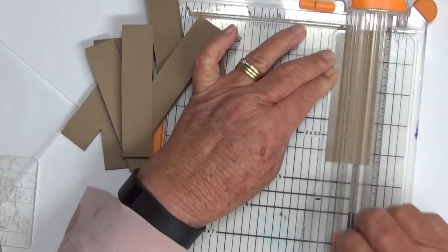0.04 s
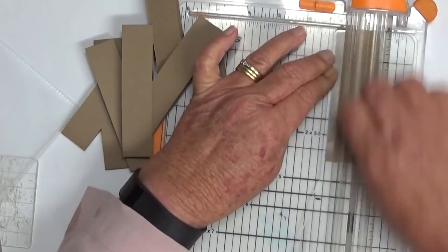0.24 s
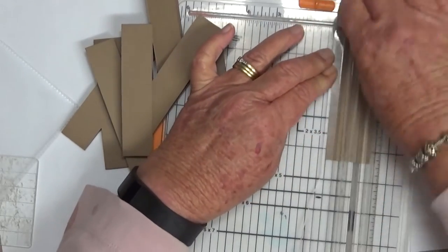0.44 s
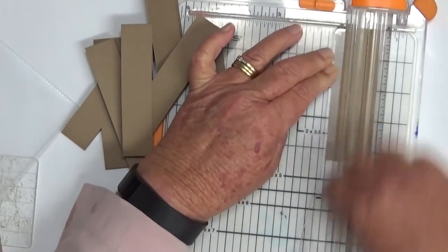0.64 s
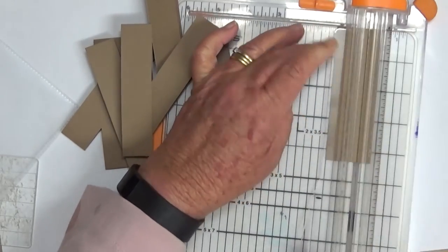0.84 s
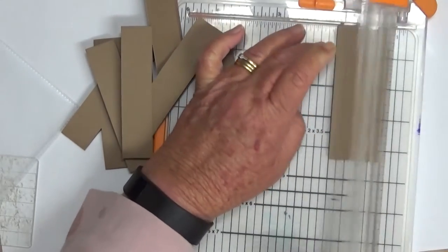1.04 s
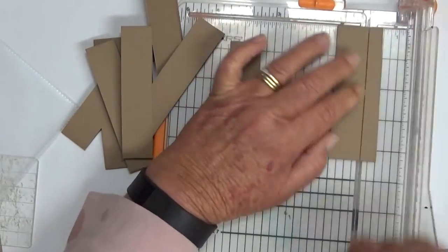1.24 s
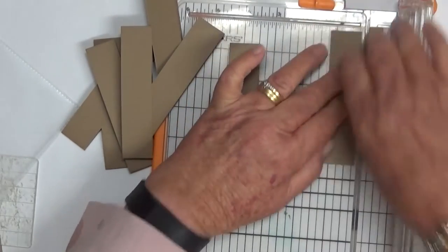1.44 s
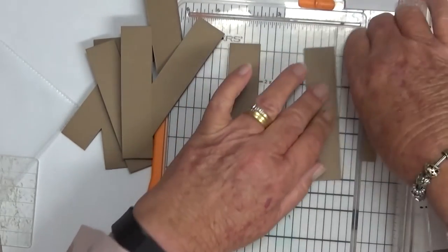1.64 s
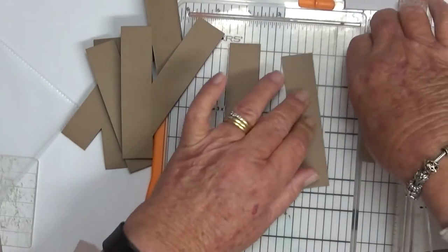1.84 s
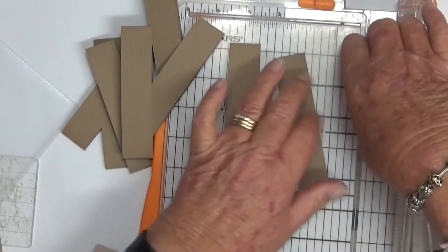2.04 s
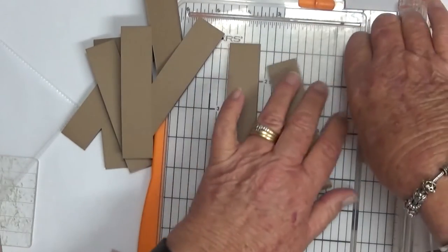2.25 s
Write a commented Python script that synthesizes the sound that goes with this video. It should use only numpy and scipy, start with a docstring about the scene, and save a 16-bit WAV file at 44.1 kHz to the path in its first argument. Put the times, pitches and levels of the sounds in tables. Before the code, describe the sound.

Close up, a paper trimmer cuts card with two quick, rumbling scrapes. A knock and sharp plastic clicks follow as the guard lifts, a bracelet tinkles faintly, and card strips hiss across the base in a quiet room.

```python
"""Paper trimmer on a craft table

Close by, the blade carriage of a plastic trimmer scrapes through card, up and back, and friction makes
the deck rumble. Impacts excite the modes of the clear guard rail and the deck as the rail clicks, knocks
and is swung open. Fingers slide the cut strips, hands bump the table and a bracelet charm tinkles.
A small, quiet room answers with a short reverberation."""
import sys
import numpy as np
from scipy import signal
from scipy.fft import rfft, irfft, next_fast_len
from scipy.io import wavfile
from scipy.ndimage import uniform_filter1d, map_coordinates

SR = 44100
rng = np.random.default_rng(int(sys.argv[2]) if len(sys.argv) > 2 else 0)


def pcm_store(signal):
    """Save signal as 16-bit PCM."""
    levels = np.round(np.clip(np.atleast_2d(signal), -1, 1) * 32767)
    wavfile.write(sys.argv[1], SR, levels.astype(np.int16).T)


N = 101429

# normal modes of the guard rail and of the deck (frequency [Hz], level [dB], t60 [s])
RAIL_MODES = [(2080, 3, 0.057), (2850, 3.5, 0.065), (3570, 3, 0.1), (4030, 2.5, 0.085), (4536, 1.5, .045),
              (5660, 4, 0.038), (6400, 1.5, 0.023), (7035, 0.5, 0.041), (7420, 2, 0.021), (7720, -9, 0.017),
              (9160, 4, .035), (9930, -1, 0.032)]
DECK_MODES = [(74.2, -23.5, 0.62), (147, -22, 0.11), (227, -2.5, 0.083), (294, -4.5, 0.079),
              (350.5, -5, 0.068), (441, -2.5, 0.043), (536, -4.5, 0.065), (614, 1, 0.051),
              (853, -0.5, 0.06), (1166, 2.5, 0.044), (1488, -7, 0.11)]
# spectrum of the reflections that give width (frequency [Hz], gain [dB])
REFLECTION_SPECTRUM = [(100, -27), (400, 1), (1300, 4.5), (4000, 0), (9000, -0.5), (15000, -17.5)]


def carriage():
    """Forced vibration: each stroke scrapes the card and drives the deck's resonances."""
    # envelopes of the two strokes (time [s], scrape level [dB], rumble level [dB])
    push = [(.04, -55, -51.5), (.07, -48.5, -51), (.125, -46, -54.5), (.174, -40.5, -54.5),
            (.24, -37.5, -43.5), (.256, -31, -34.5), (.32, -32, -43), (.36, -27, -37.5), (.385, -32.5, -44),
            (.415, -33.5, -40), (.455, -38, -36), (.48, -50, -47), (.53, -62, -61)]
    pull = [(.53, -56.5, -76), (.578, -39, -48.5), (.62, -36, -36.5), (.66, -31.5, -34), (.683, -24, -37),
            (.70, -32, -40), (.74, -35.5, -72), (.775, -53.5, -42.5)]
    # spectra of the two scrapes and of the deck's rumble (frequency [Hz], level [dB])
    push_spectrum = [(300, -40), (1000, 0), (2500, 2.5), (4000, 7), (5300, -0.5), (7000, 4.5), (9800, 6.5),
                     (12000, -6), (15500, -17)]
    pull_spectrum = [(300, -3.5), (1000, 4), (2500, 3.5), (3700, 5.5), (5300, 1), (8000, 3), (10000, -0.5),
                     (12000, -8.5), (15500, -17)]
    rumble_spectrum = [(25, -27), (70, -6), (125, -5.5), (220, 6), (320, 0), (550, -2.5), (900, -0.5),
                       (1600, -9), (4000, -31)]

    def deck_db(f):
        peaks = sum(1.3 / (1 + ((f - hz) / 14) ** 2) for hz, _, _ in DECK_MODES)
        return along(rumble_spectrum, f) + 20 * np.log10(1 + peaks)

    out = np.zeros(N)
    for stroke, spectrum in (push, push_spectrum), (pull, pull_spectrum):
        scrape, rumble = envelopes(stroke)
        out += scrape * friction(spectrum, ring_db=-19) + rumble * noise(deck_db, N)
    return out


def friction(spectrum, ring_db):
    """Roughness noise: card fibres rub and excite the rail; the colour shifts as the contact moves."""
    def rail_db(f):
        peaks = sum(amp(ring_db + db) / (1 + ((f - hz) * t60 / 4) ** 2) for hz, db, t60 in RAIL_MODES)
        return 20 * np.log10(1 + peaks)

    spectrogram = signal.stft(grains(N, depth_db=2, per_s=1500), nperseg=512)[2]
    patches = uniform_filter1d(rng.standard_normal(spectrogram.shape), size=4, axis=0)
    patches_db = 3 * unit(uniform_filter1d(patches, size=9, axis=1))
    rub = signal.istft(spectrogram * amp(patches_db), nperseg=512)[1][:N]
    return unit(coloured(rub, lambda f: along(spectrum, f) + rail_db(f)))


def rail_clicks():
    """Impact excitation: hard plastic chatters for milliseconds, then the rail's modes ring freely."""
    # clicks (time [s], level [dB], chatter [s], centre [Hz], width [octaves], favoured frequency [Hz])
    clicks = [(0.4278, -14.5, 0.0011, 6200, 0.41, 6600), (.6715, -23.5, .0005, 4850, 0.28, 3570),
              (0.8556, -32, 0.0019, 1700, 1.6, 2850), (.8665, -29, .002, 1000, 0.48, 2850),
              (0.9326, -20.5, .0015, 9900, 0.59, 9300), (.944, -34.5, 0.0023, 10000, 1.5, 9160),
              (.974, -20, 0.00084, 8950, 0.82, 7420), (.988, -32, 0.0018, 8340, .54, 9160),
              (1.096, -34.5, 0.0032, 10000, 0.15, 9930), (1.112, -39, 0.00077, 2600, 0.54, 2850),
              (1.1425, -31, .0007, 2480, 0.87, 2850), (1.2117, -16.5, 0.0017, 8200, 0.78, 7420),
              (1.2182, -19, 0.0022, 8100, 0.82, 7420), (1.224, -26, 0.0041, 4500, 1.1, 5050),
              (1.2332, -26.5, 0.0035, 8000, 3.1, 9930), (1.2525, -29, 0.0019, 2180, 1.3, 2850),
              (1.2678, -30, 0.0029, 1980, 0.45, 2850), (1.2878, -30.5, 0.0011, 1900, 1, 2080),
              (1.3016, -43, .0005, 5000, 0.66, 6400), (1.512, -21, .0019, 7500, 1.05, 4400),
              (1.6708, -22.5, 0.0019, 6700, 0.85, 7300), (1.781, -18.5, 0.0034, 9100, 0.91, 5660),
              (2.0126, -25.5, .003, 6400, 0.8, 7500), (2.258, -42, 0.0029, 9000, .96, 7420)]
    # spectrum of the contact noise (frequency [Hz], level [dB])
    crack_spectrum = [(200, -18), (700, 0.5), (1400, 2), (2400, 1), (3700, 5.5), (5000, 4), (7000, 3),
                      (10000, 5.5), (12500, -2), (15500, -11)]
    rail_db = lambda f: 3.5 * sum(np.exp(-((f - hz) / 52) ** 2) for hz, _, _ in RAIL_MODES)
    out, t = np.zeros(N), event_time()
    for start, db, chatter, centre_hz, octaves, favoured_hz in clicks:
        crack_db = lambda f: along(crack_spectrum, f) + bell(f, centre_hz, octaves) + rail_db(f)
        crack = noise(crack_db, len(t)) * decay(t - chatter, t60=0.02)
        ring = np.zeros(len(t))
        for hz, mode_db, t60 in RAIL_MODES:
            lift_db = 10.5 * np.exp(-((hz - favoured_hz) / 490) ** 2)
            gain = amp(mode_db + bell(hz, centre_hz, octaves) + lift_db + rng.normal(0, 0.5))
            cycles = hz * t + rng.random() + 0.0085 * random_walk(len(t))
            ring += gain * decay(t, t60) * np.sin(2 * np.pi * cycles)
        add(out, start, amp(db) * (crack + amp(-16.5) * ring))
    return out


def deck_knocks():
    """Modal response: a knock gives a dead slap and rings the deck; longer contact is duller."""
    # knocks of the rail and hands (time [s], level [dB], contact time [s])
    knocks = [(.856, -18, 0.0011), (.8675, -19, 0.0012), (1.2525, -40.5, .0005), (2.028, -45, 0.00079),
              (2.279, -44, 0.00053)]
    out, t = np.zeros(N), event_time()
    slap = amp(7.5) * np.sin(2 * np.pi * 500 * t) * decay(t, t60=0.014)
    for start, db, contact in knocks:
        ring = np.zeros(len(t))
        for hz, mode_db, t60 in DECK_MODES:
            gain = amp(mode_db + rng.normal(0, 1)) / (1 + (hz * contact) ** 2)
            ring += gain * decay(t, t60) * np.sin(2 * np.pi * hz * t)
        add(out, start, amp(db) * (0.64 * ring + 1.6 * slap) * attack(t, contact))
    return out


def card_strips():
    """Sliding friction: cut strips hiss over the deck and catch in short stick-slip scuffs."""
    # envelope of the sliding (time [s], level [dB])
    slide = [(.92, -52.5), (.99, -52), (1.03, -44), (1.07, -50), (1.19, -50.5), (1.33, -46.5), (1.45, -49),
             (1.6, -44.5), (1.66, -49.5), (1.76, -50.5), (1.85, -57), (1.92, -55), (2.05, -54), (2.11, -52),
             (2.14, -91), (2.175, -50), (2.22, -92), (2.3, -76)]
    # spectrum of the sliding (frequency [Hz], level [dB])
    slide_spectrum = [(150, 5.5), (600, -3), (1200, -2.5), (1900, 1), (2600, -4), (4000, -1), (6000, -5),
                      (9000, -2.5), (12000, -14), (15500, -48)]
    # scuffs (peak time [s], level [dB], half rise time [s], t60 [s], centre [Hz], width [octaves])
    scuffs = [(0.247, -25.5, 0.0031, 0.024, 6000, 9.3), (.364, -20, 0.0049, 0.036, 6360, 0.34),
              (0.421, -24, 0.0016, 0.15, 2900, 0.68), (.789, -37.5, 0.004, 0.074, 4050, 0.37),
              (.843, -38, 0.0081, 0.052, 3570, 0.78), (0.875, -26, 0.0052, 0.046, 4030, 0.38),
              (1.102, -30, 0.0072, 0.099, 2520, 0.47), (1.146, -45.5, 0.0037, 0.42, 2320, 0.64),
              (1.245, -27.5, 0.0084, 0.11, 2230, 1.6), (1.273, -33, 0.0034, 0.1, 1690, 0.56),
              (1.291, -36, .003, 0.12, 1960, 0.55), (1.149, -43.5, .015, 0.27, 840, 0.33),
              (1.32, -39.5, 0.011, 0.044, 593, 0.37), (1.809, -37, 0.0084, 0.088, 6360, 0.89),
              (1.86, -45.5, .012, 0.07, 600, 0.28), (1.966, -36.5, 0.0045, 0.053, 690, 0.38),
              (1.966, -34.5, 0.0089, 0.027, 9650, 0.13), (2.126, -40.5, 0.017, 0.018, 7200, 0.38),
              (2.281, -43, 0.0022, 0.025, 3260, 0.71)]
    out, t = envelopes(slide)[0] * friction(slide_spectrum, ring_db=-28), event_time()
    for peak, db, half_rise, t60, hz, octaves in scuffs:
        rise = 2 * half_rise
        stick_slip = grains(len(t), depth_db=1.5, per_s=470)
        scuff_db = lambda f: bell(f, hz, octaves) + along([(10000, 2), (15500, -22)], f)
        envelope = np.minimum(t / rise, 1) ** 2 * decay(t - rise, t60)
        add(out, peak - rise, amp(db) * unit(coloured(stick_slip, scuff_db)) * envelope)
    return out


def table_thuds():
    """Damped oscillation: soft bumps swing the table for a few cycles, with a band of low noise."""
    # bumps of the hands and trimmer (time [s], level [dB], frequency [Hz])
    thuds = [(0.25, -30, 124), (0.255, -25.5, 224), (0.391, -28, 126), (0.564, -31.5, 130),
             (0.43, -25.5, 75), (0.855, -22.5, 211), (1.098, -36.5, 128), (1.239, -34, 124),
             (1.2456, -20.5, 126.5), (1.549, -26.5, 156), (1.593, -33, 145), (1.61, -33, 134),
             (1.782, -39, 136), (1.977, -42.5, 146), (2.28, -34.5, 125)]
    out, t = np.zeros(N), event_time()
    for start, db, hz in thuds:
        def band_db(f):
            octaves = np.log2((f + 1) / hz)
            return -6 * (octaves / 0.93) ** 2 / (1 + abs(octaves))

        body = noise(band_db, len(t)) * decay(t, t60=0.15) * attack(t, rise_s=0.017)
        swing = np.sin(2 * np.pi * hz * t) * decay(t, t60=0.069) * attack(t, rise_s=0.01)
        add(out, start, amp(db) * (amp(4.5) * swing + amp(-7.5) * body))
    return out


def charm():
    """Beating: a tiny metal charm rings in three high modes, each against a weaker, detuned twin."""
    # tinkles (time [s], level [dB], extra gain of the lowest mode [dB])
    tinkles = [(.005, -37.5, 1.5), (.781, -26.5, -8), (1.334, -43, -21), (1.3436, -33, -7),
               (1.371, -38.5, -11)]
    # normal modes of the charm (frequency [Hz], level [dB], t60 [s])
    modes = [(6190, 0, .1), (9775, 1, .088), (14100, -16, .135)]
    split_hz, twin_db, gain_db = 75, -19, 2
    out, t = np.zeros(N), event_time()
    for start, db, lowest_db in tinkles:
        for k, (hz, mode_db, t60) in enumerate(modes):
            phase = 2 * np.pi * hz * t + 0.13 * random_walk(len(t))
            pair = np.sin(phase) - amp(twin_db) * np.sin(phase + 2 * np.pi * split_hz * t)
            gain = amp(gain_db + db + mode_db + lowest_db * (k == 0))
            add(out, start, gain * pair * decay(t, t60) * attack(t, rise_s=0.00024))
    return out


def early_reflections(x):
    """Scattering: the table and the things on it return a dense patter of short echoes."""
    t = event_time()
    taps = rng.standard_normal(len(t)) * decay(t, t60=0.061) * (t > .001)
    echoes = signal.fftconvolve(x, taps / np.linalg.norm(taps))[:N]
    return coloured(echoes, lambda f: along(REFLECTION_SPECTRUM, f))


def reverberation(x):
    """Diffuse field: a short tail of noise in which the treble is absorbed fastest."""
    # reverberation times (frequency [Hz], t60 [s])
    decay_times = [(150, 0.29), (1000, 0.18), (5000, 0.17), (14000, 0.16)]
    hz, t, spectrogram = signal.stft(rng.standard_normal(SR // 2), SR, nperseg=256)
    tail = signal.istft(spectrogram * decay(t, along(decay_times, hz)[:, None]), SR, nperseg=256)[1]
    delayed_tail = np.pad(tail, (SR // 300, 0)) / np.linalg.norm(tail)
    return signal.fftconvolve(x, delayed_tail)[:N]


def room_tone():
    """Stationary noise: a faint, mostly low background."""
    # spectrum of the background (frequency [Hz], level [dB])
    spectrum = [(18, -74), (30, -5), (192, -5), (324, -6), (561, -6.5), (728, -14.5), (874, -6),
                (1110, -18.5), (2020, -18.5), (2240, -24.5), (15500, -28.5)]
    return amp(-51) * noise(lambda f: along(spectrum, f), N)


def amp(db):
    """Decibels to amplitude ratio."""
    return 10 ** (np.asarray(db) / 20)


def unit(x):
    """Normalisation to rms 1."""
    return x / np.sqrt(np.mean(x ** 2) + 1e-20)


def along(points, hz):
    """Interpolation of (frequency [Hz], value) points on a logarithmic axis."""
    f, values = np.transpose(points)
    return np.interp(np.log(hz + 1), np.log(f + 1), values)


def bell(hz, centre_hz, octaves, skirt_db=-14):
    """Band emphasis in dB: a Gaussian in log frequency that levels out on its skirts."""
    return 20 * np.log10(np.exp(-.5 * (np.log2((hz + 1) / centre_hz) / octaves) ** 2) + amp(skirt_db))


def coloured(x, gain_db):
    """Zero-phase filtering by a dB function of frequency."""
    size = next_fast_len(x.shape[-1] + SR // 8)
    gain = amp(gain_db(np.fft.rfftfreq(size, 1 / SR)))
    return irfft(rfft(x, size) * gain, size)[..., :x.shape[-1]]


def noise(gain_db, size):
    """Filtered Gaussian noise of rms 1."""
    return unit(coloured(rng.standard_normal(size), gain_db))


def grains(size, depth_db, per_s):
    """Random amplitude modulation: noise whose strength varies from grain to grain."""
    carrier = rng.standard_normal(size)
    strength = map_coordinates(rng.standard_normal(size), [np.arange(size) * per_s / SR])
    return carrier * amp(depth_db * strength)


def random_walk(size):
    """Brownian drift; added to a phase, it broadens the spectral line."""
    return np.cumsum(rng.standard_normal(size))


def envelopes(rows):
    """Gain per sample for each dB column, silent outside the rows' times."""
    times, *columns = np.transpose(rows)
    return [amp(np.interp(np.arange(N) / SR, times, db, left=-120, right=-120)) for db in columns]


def event_time():
    """Time axis of one transient, in seconds."""
    return np.arange(SR // 4) / SR


def attack(t, rise_s):
    """Exponential approach to 1 with time constant rise_s."""
    return 1 - np.exp(-t / rise_s)


def decay(t, t60):
    """Exponential damping by 60 dB in t60 seconds, held at 1 before t = 0."""
    return np.exp(-np.log(1000) * np.maximum(t, 0) / t60)


def add(track, start_s, x):
    """Superposition of x on the track from start_s."""
    i = max(round(start_s * SR), 0)
    track[i:i + len(x)] += x[:max(N - i, 0)]


def scene():
    """Mid-side stereo: all sources lie just left of centre, and reflections give width."""
    # level bias, added on the left and subtracted on the right (frequency [Hz], gain [dB])
    lean = [(400, 0.5), (4000, .5)]
    reverb_db, early_db, width_db = -11.5, -16, -18
    direct = carriage() + card_strips() + rail_clicks() + deck_knocks() + table_thuds() + charm()
    mid = direct + amp(reverb_db) * reverberation(direct) + room_tone()
    early = early_reflections(mid)
    late = coloured(reverberation(direct), lambda f: along(REFLECTION_SPECTRUM, f))
    side = amp(early_db) * early + amp(reverb_db + width_db) * late
    left = coloured(mid + side, lambda f: along(lean, f))
    right = coloured(mid - side, lambda f: -along(lean, f))
    return np.array([left, right])


def record(dry):
    """Band limiting: a steep low-pass removes the highest treble."""
    cutoff_hz = 15900
    return coloured(dry, lambda f: np.where(f < cutoff_hz, 0, -100))


dry = scene()
out = record(dry)
pcm_store(out)
```